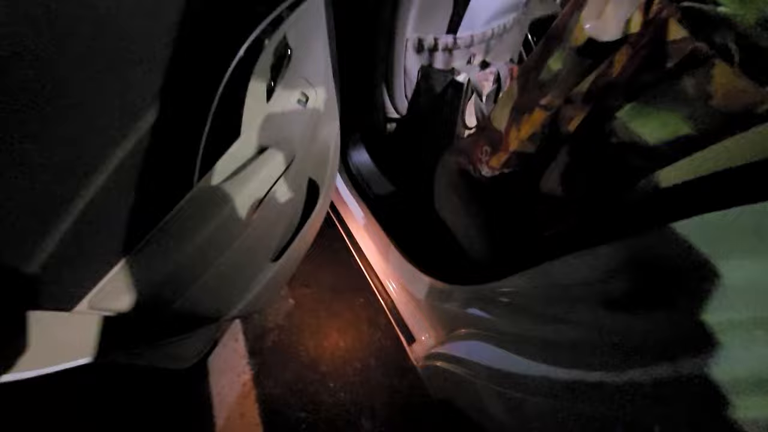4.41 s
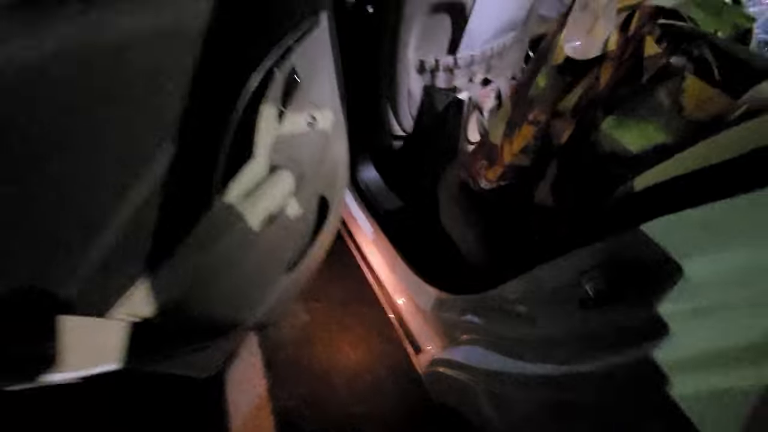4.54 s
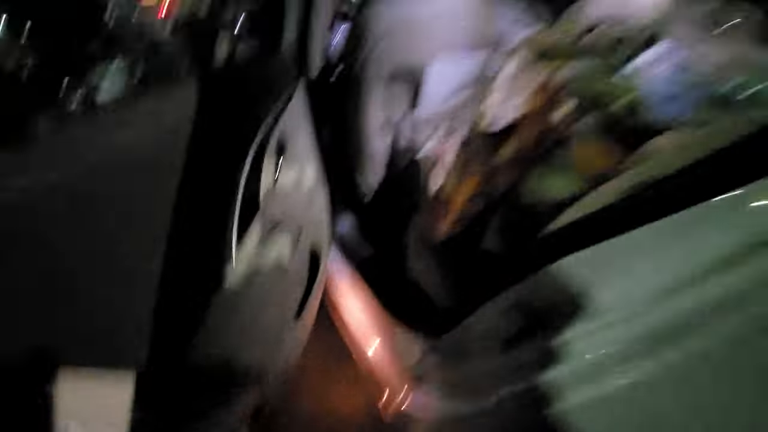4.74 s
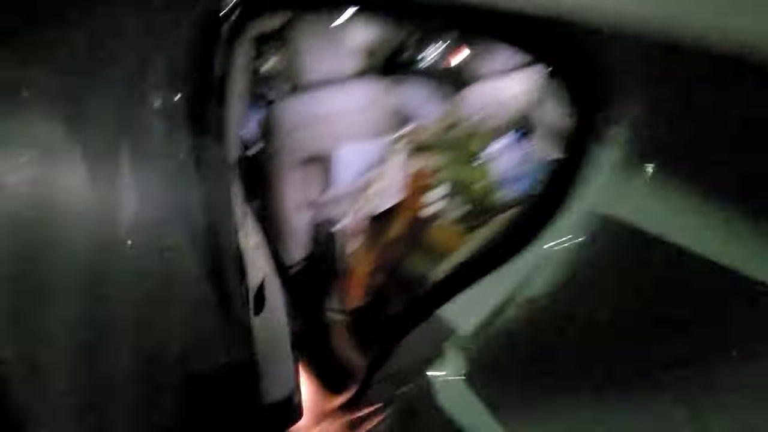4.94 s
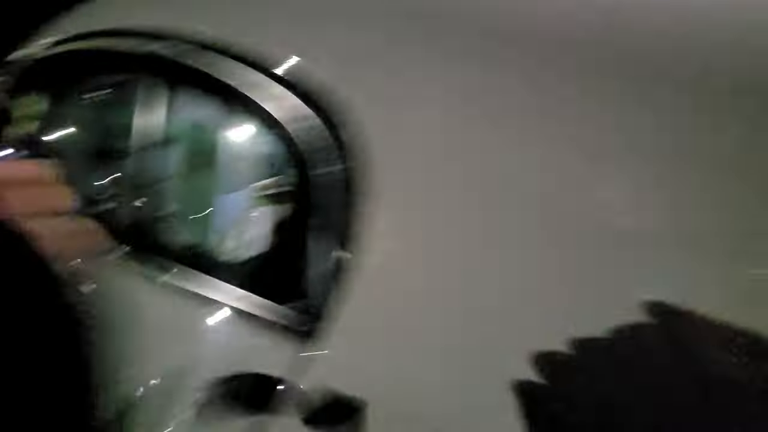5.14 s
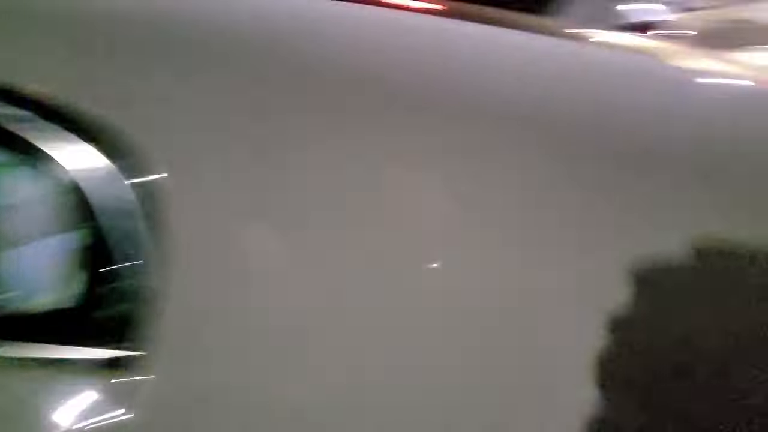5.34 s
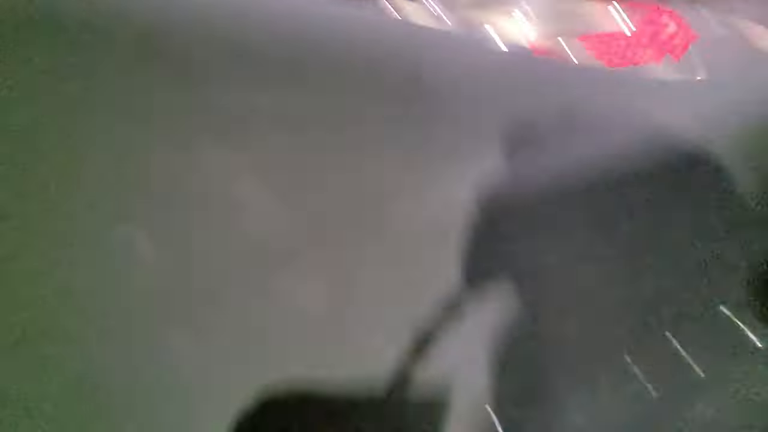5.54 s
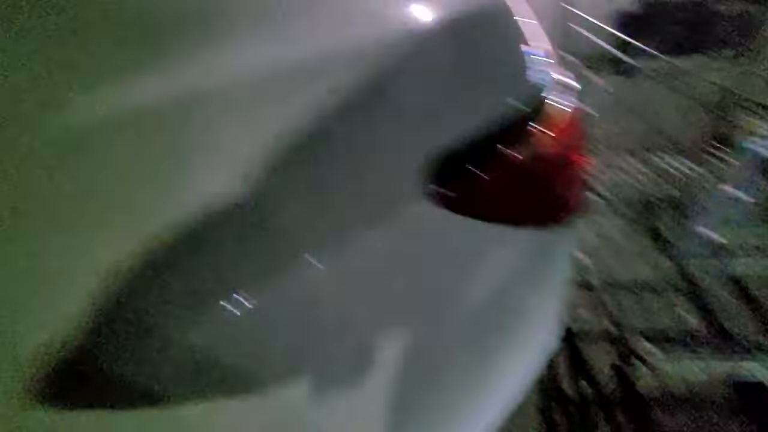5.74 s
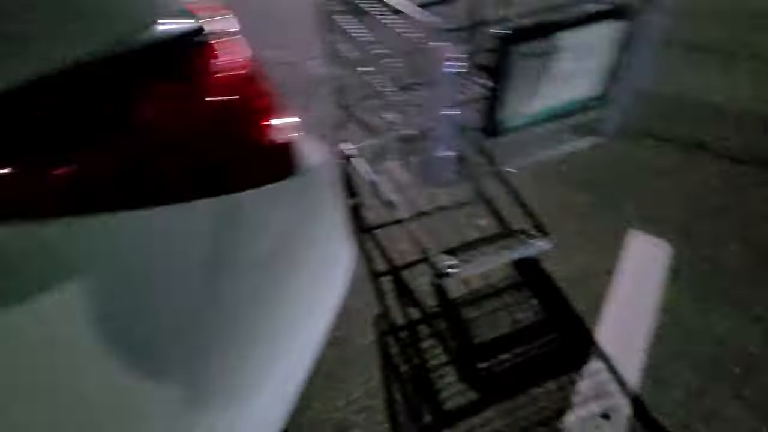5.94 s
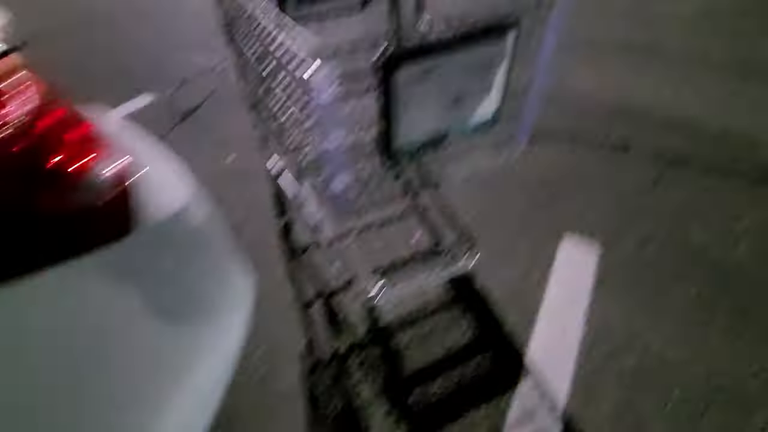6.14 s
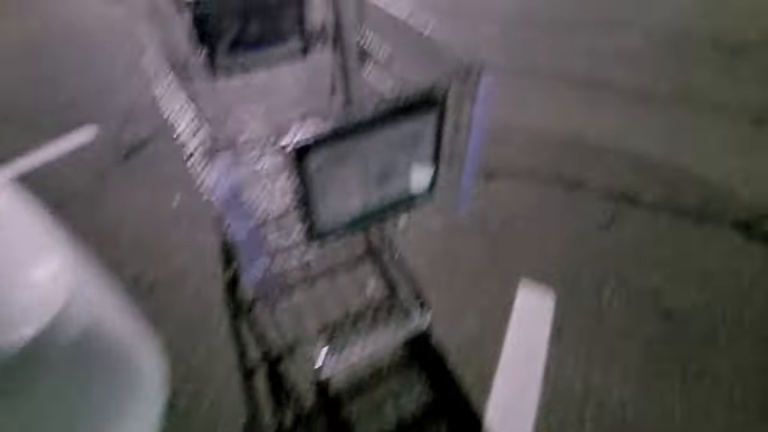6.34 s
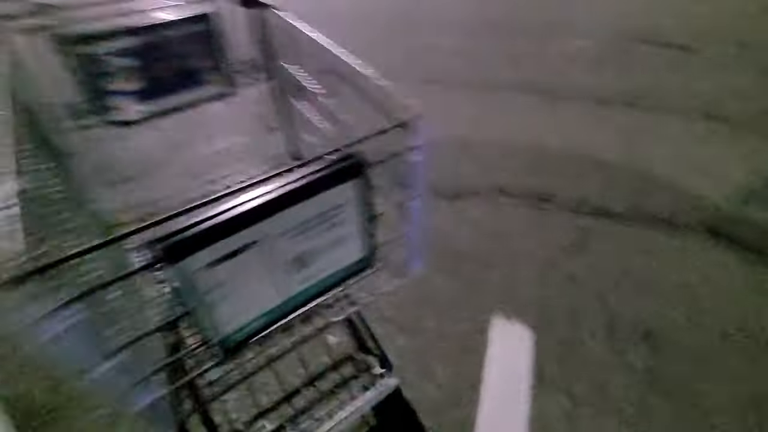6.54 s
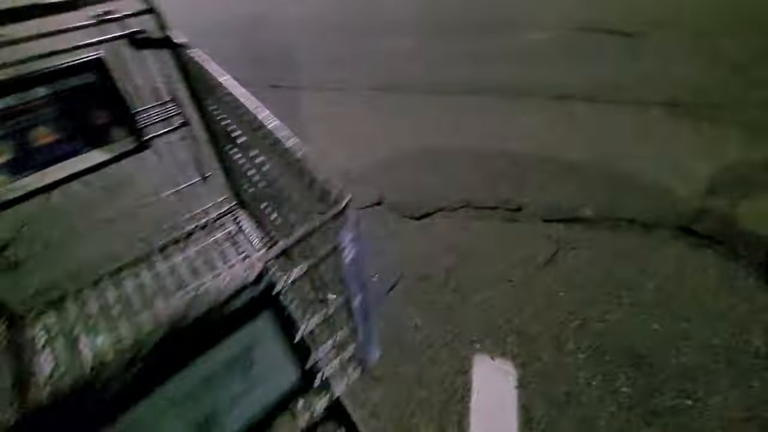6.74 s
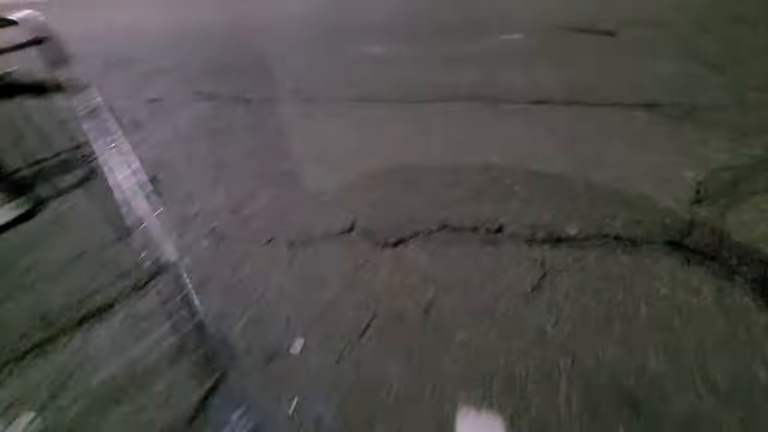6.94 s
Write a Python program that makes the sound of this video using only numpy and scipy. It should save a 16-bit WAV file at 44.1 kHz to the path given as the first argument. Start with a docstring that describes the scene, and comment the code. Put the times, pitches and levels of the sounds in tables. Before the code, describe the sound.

In a night parking lot, a loaded metal cart clatters and rustles, quiets, then a car door thuds shut before faint cloth swish and rolling.

```python
"""Shopping is shifted about in a wire cart close by, at night in a parking lot: knocks and scraping rustles
made of shaped noise and short rings. Under it idling cars drone, as slowly varying bands of noise.
Small metal parts jingle and latches snap, with bright rings and noise bursts. A car door slams with
dull noise and low vibrations. At last clothing swishes and the cart starts to roll, in grainy noise."""
import sys
import numpy as np
from scipy import signal
from scipy.fft import rfft, irfft
from scipy.io import wavfile

SR = 44100
rng = np.random.default_rng(int(sys.argv[2]) if len(sys.argv) > 2 else 0)


def output_pcm(signal):
    """Save a mono or channel-first signal as 16-bit PCM at the path in sys.argv[1].

    Samples are clipped to [-1, 1] before scaling.
    """
    pcm = np.clip(np.atleast_2d(signal).T, -1, 1) * 32767
    wavfile.write(sys.argv[1], SR, np.round(pcm).astype(np.int16))


N = 308700  # samples, 7 s
TIME, HZ = np.arange(N) / SR, np.fft.rfftfreq(N, 1 / SR)
RING = TIME[:SR // 3]  # time scale of one ring, in seconds
EDGE_HZ = 16000  # nothing is heard above this

# Levels in the tables are relative: each sound adds its own offsets and a slight lean to one side.
# Spectra give only a shape, since the noise is afterwards scaled to an even level.

# how alike left and right are: pitch_hz, likeness (0 to 1)
LIKENESS = [(30, .45), (60, 0.83), (130, 0.94), (300, 0.83), (700, 0.38), (1500, 0.083), (5000, 0.067),
            (15000, 0.13)]
PORT_LAG_S = 0.000279  # the left port leads by this much

# the parking lot: drone, rumble, road noise, hiss: low_hz, high_hz
LOT_BANDS = [(20, 100), (100, 420), (420, 4500), (4500, 16000)]
# colour of the night air: pitch_hz, level_db
AIR_SPECTRUM = [(12, -43), (20, -9), (76, -3.5), (178, -14.5), (286, -20.5), (600, -35.5), (1050, -40),
                (2300, -45), (3500, -56), (7000, -51), (9000, -55), (15000, -51.5)]
DRONE_HZ, DRONE_WIDTH_HZ = 56.8, 18
# drone of idling engines: time_s, level_db
DRONE_CURVE = [(0, -27.5), (1.6, -34), (3.5, -36), (3.95, -29.5), (4.45, -25.5), (4.75, -39.5),
               (5.05, -31.5), (5.4, -34), (5.8, -40), (5.96, -43), (6.4, -45.5), (6.68, -32.5), (7, -35.5)]
RUMBLE_DB, RUMBLE_FOLLOW = -17.5, 0.63  # the rumble above the drone swells with it, but less
# road noise: time_s, level_db
ROAD_CURVE = [(0, -37.5), (2.3, -66), (2.9, -50), (3.4, -56), (3.85, -48), (4.4, -43.5), (4.7, -53),
              (5.699, -56), (6.2, -53), (7, -45)]
# hiss: time_s, level_db
HISS_CURVE = [(0, -55), (4.5, -63.5), (4.7, -67), (5.9, -72.5), (6.7, -60)]

# registers of the cart's sound, hollow body, clack, crack, fizz: low_hz, high_hz
REGISTERS = [(125, 500), (500, 1800), (1800, 6000), (6000, 16000)]
# clack, crack and fizz of a contact of neutral brightness: level_db
REGISTER_DB = [-1, 1.1, -5.5]
# how far clack, crack and fizz follow the brightness: share
BRIGHT_SHARE = [-0.39, 0.7, 2.56]
# resonances of basket and frame: pitch_hz, width_hz, lift_db
FRAME_RESONANCES = [(276, 330, 1), (547, 75, 0.5), (906, 26, 1), (1010, 23, 2.5), (1300, 23, -4.5),
                    (1444, 15, -8), (2180, 180, 2), (2406, 78, 1), (2620, 32, 3), (3110, 40, 1.5),
                    (3380, 80, -1.5), (7440, 370, 5.5)]
# how busily the load is being handled: time_s, level_db
HANDLING_CURVE = [(0, -29), (.15, -42), (.5, -36.5), (.65, -39), (1, -43.5), (1.15, -33.5), (1.55, -43.5),
                  (1.66, -36), (2.2, -32), (2.6, -51), (2.86, -49)]

# scraping strokes, the last two being small cloth swishes:
# start_s, length_s, level_db, brightness_db, thud_db, change_db (over the stroke)
SCRAPES = [(0.008, 0.082, -40.5, -5, -25.5, 4.5), (0.566, 0.043, -31.5, 4, -27, -2),
           (1.029, 0.059, -33.5, -1, -35, 2.5), (1.285, 0.13, -30, 0.5, -30.5, -9),
           (1.726, 0.345, -23, 0.47, -22, -16.5), (2.061, 0.33, -23.5, 0.5, -17, -18.5),
           (2.336, 0.218, -36.5, -2.5, -28, -5.5), (2.709, 0.082, -46.5, 4, -31.5, -5.5),
           (3.519, 0.054, -50, 3.5, -48, -16), (3.764, 0.071, -64.5, 8, -41, -1.5),
           (4.975, 0.077, -60, 5, -37, -2)]
# colour of dragged bags and cloth: pitch_hz, level_db
RUSTLE_SPECTRUM = [(65, -40), (110, 8.5), (141, -1.5), (188, -8.5), (289, 3), (370, -14.5), (645, -12),
                   (1010, -11.5), (1320, -8.5), (2560, -15.5), (3480, -16), (7300, -27), (8610, -30.5),
                   (15000, -26.5)]
# how far each register follows the swell or fade of a stroke: share
FADE_SHARE = [0.84, 1.02, 1.38, 0.98]

# knocks of the load against the cart: start_s, level_db, brightness_db, thud_db, pitch_hz (struck part)
KNOCKS = [(0.029, -32, 0.5, -22, 1500), (0.055, -24.5, -12, -17.5, 550), (0.066, -22, -1.5, -34, 3280),
          (0.07, -23.5, -13, -23, 820), (0.09, -33.5, -12, -13.5, 530), (0.22, -38.5, -11, -40, 870),
          (0.332, -30, -6.5, -23.5, 1370), (0.361, -30.5, -4.5, -23.5, 2840), (0.408, -36.5, 1, -24.5, 530),
          (0.428, -34.5, -6.5, -65, 850), (0.487, -56, -19, -22.5, 556), (0.576, -29.5, -21, -39, 2620),
          (0.585, -21.5, 0.5, -23, 3480), (0.601, -28, 1.5, -27, 3430), (0.669, -38.5, -4, -26, 3220),
          (0.72, -34, -6, -25, 564), (0.737, -41, -18, -23, 530), (0.775, -35, -9, -34.5, 830),
          (0.837, -38, -10, -34.5, 1690), (0.887, -38.5, -8, -54, 900), (1.015, -36.5, -15, -23, 710),
          (1.047, -22, -11.5, -23, 850), (1.062, -21, -0.5, -16.5, 2040), (1.08, -28.5, 1.4, -46, 2830),
          (1.197, -27.5, -1, -16.5, 3360), (1.29, -27, 2, -24, 2440), (1.422, -32.5, -0.5, -23.5, 3550),
          (1.471, -35.5, -5.5, -35, 1530), (1.533, -38.5, -12, -37, 920), (1.603, -39.5, -1.5, -36.5, 3940),
          (1.718, -27, 1, -24, 1010), (1.731, -21, -9.5, -40, 1010), (1.741, -21.5, 2, -26, 2540),
          (1.762, -21, 0.5, -22, 2260), (1.776, -22, -2, -23, 2100), (1.793, -24, -7, -20, 1150),
          (1.822, -24, -5, -14.5, 2430), (1.839, -24.5, -4, -37, 2800), (1.868, -28, 0, -23, 2210),
          (2.055, -20.5, -1.5, -20, 2000), (2.065, -32, 0, -17, 2320), (2.116, -23, -2, -32, 2640),
          (2.134, -19.5, -0.5, -18.5, 2700), (2.15, -22.5, 0, -24.5, 1560), (2.177, -23.5, 1, -23.5, 2260),
          (2.25, -26.5, -1, -24.5, 4330), (2.366, -28.5, -4, -24, 3080), (2.392, -29.5, -1, -48, 3800),
          (2.404, -27, -3, -37, 2390), (2.464, -33.5, -2.5, -35, 3880), (2.523, -27, -5, -30, 1410),
          (2.532, -33.5, -1.5, -53, 1980), (2.594, -46.5, -13, -32.5, 1160), (2.692, -39.5, -13, -34, 1940),
          (2.797, -44.5, 4, -30, 590), (2.921, -45, -9, -33.5, 2120), (2.983, -37.5, -10, -37, 1440),
          (3.196, -45.5, -10.5, -43, 1740), (3.524, -38.5, -15, -31, 730), (3.739, -60, -12, -29, 520),
          (3.828, -47, -9, -30.5, 524), (4.137, -41, -12, -28.5, 1460), (5.375, -56.5, -11, -56, 1390),
          (6.023, -47.5, -9, -56, 1280), (6.103, -46.5, -15, -44, 910), (6.501, -49, -7, -46, 3300),
          (6.648, -51, -11, -34, 1630)]
# fast die-away of a knock in each register: t60_s
KNOCK_T60_S = [0.052, 0.035, .036, 0.02]
# colour of the loaded cart: pitch_hz, level_db
BODY_SPECTRUM = [(65, -38), (110, -17.5), (138, -0.5), (188, -5.5), (289, 3), (474, -9), (558, -6),
                 (672, -7.5), (1880, -13), (2360, -12.5), (4550, -19), (7450, -19.5), (9160, -23),
                 (15000, -18.5)]
# close modes of a struck part around its pitch: ratio
PART_RATIOS = [1, 1, 1.19]
PART_DB, PART_T60_S = 5.5, 0.03  # each of these modes
CHATTER_PER_S, CHATTER_DB, CHATTER_SPREAD_DB = 22, -7, 9  # loose wires tap while the load is handled

# small metal parts touching: start_s, level_db
JINGLES = [(0.025, -34), (0.463, -28), (1.604, -25.5), (2.8219, -22), (2.916, -22), (3.5877, -39.5),
           (3.6472, -36), (4.3156, -35), (4.5025, -37), (4.556, -18), (4.6728, -43), (4.8983, -37),
           (5.089, -14), (5.116, -17), (5.1914, -28), (5.231, -34.5), (5.2715, -31), (5.3255, -45),
           (5.385, -45), (5.785, -39), (5.913, -37.5), (6.011, -38.5), (6.0806, -34.5), (6.6657, -40)]
# their ring: pitch_hz, level_db, t60_s
METAL_MODES = [(6650, 0.5, 0.042), (8930, -2.5, 0.07), (13400, -7.5, 0.086), (13100, -22, 0.15),
               (13100, 8.5, 0.042), (15500, -8.5, .04)]
REBOUND_S, REBOUND_DB = .024, -12.5  # typical delay of the lighter second touch, and its level

# dull thumps of the car body and the load: start_s, level_db, pitch_hz, t60_s
THUMPS = [(1.014, -7.5, 284, 0.088), (1.289, -1.5, 160, 0.034), (4.32, -6, 67, 0.26),
          (4.33, -16, 115, 0.34), (4.58, -23, 323, 0.26), (5.133, -0.5, 56.4, 0.41), (5.798, -20, 58, 0.26)]
# the door meets its seal, then settles: start_s, level_db
SLAMS = [(5.114, -11), (5.124, -5.5), (5.136, -11), (5.161, -18), (5.19, -16)]
# colour of the door: pitch_hz, level_db
DOOR_SPECTRUM = [(59, -29), (100, -6), (246, -6), (304, -7), (436, -21), (668, -20), (701, -22.5),
                 (761, -21), (1130, -22.5), (2510, -43), (5000, -52), (6500, -74), (11000, -120)]
# ring of the door panel: pitch_hz, level_db, t60_s
PANEL_MODES = [(113.7, -19.5, 0.66), (155, -12.5, 0.3), (261, -19.5, 0.72), (314.2, -13, 0.23),
               (391, -24, 0.37)]
CLATTER_DB = -12  # the door's trim clatters with each blow

# zipping drag, whose pitch dips and then rises: time_s, level_db, pitch_hz
ZIP_CURVE = [(1.295, -24, 2250), (1.335, -27.5, 1700), (1.374, -30.5, 2000), (1.403, -25, 2300),
             (1.432, -32, 2450)]

# a thin wire that rings on after a jolt: start_s, level_db, pitch_hz, t60_s
WIRE_RINGS = [(2.922, -50, 2250, 0.34)]

# hard snaps of latches: start_s, level_db, t60_s, treble_db (lift)
SNAPS = [(3.1435, -24, 0.069, 12), (4.5546, -15, 0.12, 5), (4.616, -35, 0.1, 4), (5.0864, -16.5, 0.16, 6),
         (5.097, -18, 0.13, -28), (5.116, -24, 0.063, 12), (5.1872, -29.5, 0.098, 2)]
# colour of the latches: pitch_hz, level_db
LATCH_SPECTRUM = [(240, -35), (400, -2), (791, -11.5), (1590, -6.5), (2090, -8), (2700, -6), (2870, -6.5),
                  (6610, -7.5), (8180, -10.5), (8820, -20), (12100, -14.5), (13300, -17), (15000, -14.5)]
CRACK_DB, CRACK_T60_S = -6.5, 0.03  # the brief crack at a latch's contact

# colour of the grit: pitch_hz, level_db
GRIT_SPECTRUM = [(400, -6), (700, -4.5), (1000, 1), (1500, -7), (2300, -5), (3300, -17.5), (4500, -23),
                 (8000, -44)]
SWISH_START_S, SHAKE_START_S = 6.15, 6.53  # a soft swish and faint grit begin to swell; the basket shakes
FLUTTER_HZ, FLUTTER_DB = 21.9, 3  # the swish and grit flutter, up to this rate


def amp(db):
    """Decibels to gain."""
    return np.exp(np.asarray(db) * (np.log(10) / 20))


def read(points, hz):
    """A table read along a logarithmic frequency axis."""
    f, value = np.transpose(points)
    return np.interp(np.log(hz + 1), np.log(f + 1), value)


def evened(x):
    """A sound scaled so that the average of its channels has rms 1."""
    return x / np.sqrt(np.mean(x.mean(0) ** 2) + 1e-20)


def add(mix, s, sound):
    """Mixes a sound in at a time in seconds."""
    part = mix[:, max(round(s * SR), 0):][:, :sound.shape[-1]]
    part += sound[..., :part.shape[1]]


def band(lo, hi):
    """Steep band-pass gain."""
    slopes = (1 + (lo / (HZ + 1)) ** 10) * (1 + (HZ / hi) ** 10)
    return (HZ < EDGE_HZ) / np.sqrt(slopes)


def peak(hz, width_hz):
    """Gain of one resonance, 1 at its centre."""
    return 1 / (1 + (2 * (HZ - hz) / width_hz) ** 2)


def ports(drive):
    """Spectra at two microphone ports, alike in the bass and apart in the treble."""
    a, b = rfft(drive)
    same = np.clip(read(LIKENESS, HZ), 0, 1)
    right = same * a + np.sqrt(1 - same ** 2) * b
    return np.array([a, right * np.exp(-2j * np.pi * HZ * PORT_LAG_S)])


def shaped(z, gain):
    """Port spectra through a colour, turned into sound at rms 1."""
    return evened(irfft(z * gain, N))


def noise():
    """Port spectra of white noise."""
    return ports(rng.standard_normal((2, N)))


def grains(per_s, spread_db, grain_s):
    """Port spectra of tiny slips of uneven size, each a short puff of noise."""
    size = amp(spread_db * np.minimum(rng.exponential(1, N), 4))
    size = size * (rng.random(N) < per_s / SR)
    power = signal.lfilter([1], [1, -np.exp(-1 / (SR * grain_s))], size ** 2)
    return ports(np.sqrt(power) * rng.standard_normal((2, N)))


def burst(source, t60, rise_s, tail_db, tail_t60):
    """A piece of noise dying fast, then slowly; its energy is that of rms 1 for about 13 ms."""
    start = rng.integers(N - len(RING))
    fall = amp(-60 * RING / t60) + amp(tail_db - 60 * RING / tail_t60)
    fade = fall * (1 - np.exp(-RING / rise_s))
    return evened(source[:, start:start + len(RING)] * fade) / 5


def mode(hz, t60, rise_s, phase=0):
    """One dying vibration: a sine that rises quickly and fades by 60 dB in t60 seconds."""
    swing = np.sin(2 * np.pi * hz * RING + phase)
    return swing * amp(-60 * RING / t60) * (1 - np.exp(-RING / rise_s))


def stroke(start, length, db, change_db, attack_s, release_s):
    """Gain of one push: attack, a steady swell or fade, release."""
    gain, t = np.zeros((1, N)), np.arange(0, length, 1 / SR)
    ends = np.clip(np.minimum(t / attack_s, (length - t) / release_s), 0, 1)
    add(gain, start, amp(db + change_db * t / length) * ends)
    return gain


def along(s, db, edge_s):
    """Gain along a level curve with quick ends."""
    ends = np.clip(np.minimum(TIME - s[0], s[-1] - TIME) / edge_s, 0, 1)
    return amp(np.interp(TIME, s, db)) * ends


def flutter(depth_db, top_hz):
    """A gain that wavers at random, no faster than about top_hz."""
    waver = irfft(rfft(rng.standard_normal((1, N))) * band(2.8, top_hz), N)
    return amp(depth_db * evened(waver))


def cart_colour(spectrum):
    """A broad spectrum with the resonances of the frame standing on it."""
    lift_db = sum(db * peak(hz, width) for hz, width, db in FRAME_RESONANCES)
    return amp(read(spectrum, HZ) + lift_db)


def contact(db, brightness, thud_db):
    """Register levels: weight drives the hollow body, a harder contact reaches further into the treble."""
    upper_db = db + brightness * np.array(BRIGHT_SHARE) + np.array(REGISTER_DB)
    return [thud_db, *upper_db]


def lot():
    """Engines drone in a narrow low band and the rumble follows; road noise and hiss lie above."""
    curves = (DRONE_CURVE, ROAD_CURVE, HISS_CURVE)
    drone_db, road_db, hiss_db = (np.interp(TIME, *np.transpose(curve)) for curve in curves)
    levels = [drone_db, RUMBLE_DB + RUMBLE_FOLLOW * drone_db, road_db, hiss_db]
    z = noise()
    colour = amp(read(AIR_SPECTRUM, HZ)) * (1 + amp(11.5) * peak(DRONE_HZ, DRONE_WIDTH_HZ))
    return sum(amp(db) * shaped(z, colour * band(*edges)) for db, edges in zip(levels, LOT_BANDS))


def scrapes():
    """Bags drag over the wires and cloth swishes by, in clumped slips; handling adds fine crinkles."""
    out, colour = np.zeros((2, N)), cart_colour(RUSTLE_SPECTRUM)
    z = grains(per_s=750, spread_db=0.5, grain_s=0.002)
    for k, edges in enumerate(REGISTERS):
        force = sum(stroke(s, length, contact(*touch)[k], FADE_SHARE[k] * change_db,
                           attack_s=0.0053, release_s=0.0043)
                    for s, length, *touch, change_db in SCRAPES)
        out += force * shaped(z, colour * band(*edges))
    crinkle_grains = grains(per_s=1100, spread_db=3.3, grain_s=.0015)
    crinkle = shaped(crinkle_grains, cart_colour(BODY_SPECTRUM) * band(220, 16000))
    busy = along(*np.transpose(HANDLING_CURVE), edge_s=0.0036)
    return out * flutter(depth_db=1.0, top_hz=70.8) + amp(-3.0) * crinkle * busy


def chatter(brightness, thud_db):
    """Light taps at random moments, on the whole stronger while the handling is busy."""
    s, db = np.transpose(HANDLING_CURVE)
    slots = np.arange(0, s[-1], 1 / CHATTER_PER_S)  # one tap falls in each slot
    late, strength = rng.random((200, 2))[:len(slots)].T
    times = slots + late / CHATTER_PER_S
    levels = np.interp(times, s, db) + CHATTER_DB + CHATTER_SPREAD_DB * (2 * strength - 1)
    return [(t, level, brightness, level + thud_db) for t, level in zip(times, levels)]


def knocks():
    """Blows rattle the loaded cart and briefly ring the part they land on; the bass swells more slowly."""
    out, colour = np.zeros((2, N)), cart_colour(BODY_SPECTRUM)
    z = grains(per_s=2500, spread_db=6, grain_s=0.0005)
    blows = [row[:4] for row in KNOCKS] + chatter(brightness=-5, thud_db=7.5)
    for k, (lo, hi) in enumerate(REGISTERS):
        rattle = shaped(z, colour * band(lo, hi))
        rise_s = max(0.5 / lo, .0012)
        for s, *blow in blows:
            hit = burst(rattle, KNOCK_T60_S[k], rise_s, tail_db=-25.5, tail_t60=0.13)
            add(out, s, amp(contact(*blow)[k]) * hit)
    for s, *blow, hz in KNOCKS:
        _, clack_db, crack_db, _ = contact(*blow)
        db = clack_db if hz < REGISTERS[2][0] else crack_db
        for ratio in PART_RATIOS:
            # the right port hears the part up to one port lag later
            phase = np.array([[0], [2 * np.pi * hz * ratio * PORT_LAG_S * rng.random()]])
            add(out, s, amp(db + PART_DB) * mode(hz * ratio, PART_T60_S, rise_s=.001, phase=-phase))
    return out


def jingles():
    """A tick and a few high modes, struck a little differently each time, then a light rebound."""
    out, tick = np.zeros((2, N)), shaped(noise(), band(5200, 16000))
    rebounds = [(s + REBOUND_S * (.5 + rng.random()), db + REBOUND_DB) for s, db in JINGLES]
    for s, db in JINGLES + rebounds:
        for hz, level_db, t60 in METAL_MODES:
            chance_db, detune = rng.uniform(-2, 2), rng.uniform(.996, 1.004)
            phase = 2 * np.pi * rng.random() + np.array([[0], [np.pi / 2]])
            ring = mode(hz * detune, t60, 0.00011, phase)
            add(out, s, amp(db + level_db + chance_db - 5.5) * ring)
        add(out, s, amp(db - 18.0) * burst(tick, t60=.018, rise_s=.0004, tail_db=-7, tail_t60=.1))
    return out


def car():
    """Low thumps, and a slam: the door's blows, the clatter of its trim and the ring of its panel."""
    out, z = np.zeros((2, N)), noise()
    door, trim = shaped(z, amp(read(DOOR_SPECTRUM, HZ))), shaped(z, band(600, 1600))
    for s, db in SLAMS:
        blow = burst(door, t60=0.15, rise_s=0.00081, tail_db=-10.0, tail_t60=0.28)
        clatter = burst(trim, t60=0.035, rise_s=0.001, tail_db=-20, tail_t60=0.16)
        add(out, s, amp(db) * blow)
        add(out, s, amp(db + CLATTER_DB) * clatter)
    # the panel starts to ring at the third blow
    add(out, SLAMS[2][0], sum(amp(db) * mode(hz, t60, 0.0016) for hz, db, t60 in PANEL_MODES))
    for s, db, hz, t60 in THUMPS:
        thump = mode(hz, t60, rise_s=0.2 / hz, phase=np.array([[.3], [-.3]]))
        add(out, s, amp(db) * thump)
    return out


def zipping():
    """A ribbed surface dragged past an edge: a fuzzy tone, noise shifted up to a gliding pitch."""
    s, db, hz = np.transpose(ZIP_CURVE)
    turn = np.exp(2j * np.pi * np.cumsum(np.interp(TIME, s, hz)) / SR)
    fuzz = irfft(rfft(rng.standard_normal((2, 2, N))) * peak(0, width_hz=1100), N)
    tone = evened(fuzz[0] * turn.real + fuzz[1] * turn.imag)
    return tone * along(s, db, edge_s=0.0046)


def wire():
    """A loose wire of the basket sings faintly, as one dying vibration."""
    out = np.zeros((2, N))
    for s, db, hz, t60 in WIRE_RINGS:
        add(out, s, amp(db) * mode(hz, t60, rise_s=.002))
    return out


def snaps():
    """Latches snap and ring off in the car's opening: noise bursts, each with a brief crack."""
    out, z, colour = np.zeros((2, N)), noise(), amp(read(LATCH_SPECTRUM, HZ))
    treble = band(9200, 17000)
    for s, db, t60, treble_db in SNAPS:
        latch = shaped(z, colour * amp(treble_db * treble))
        ring = burst(latch, t60, rise_s=0.00083, tail_db=-35, tail_t60=0.18)
        crack = burst(latch, CRACK_T60_S, rise_s=0.00045, tail_db=-41, tail_t60=0.1)
        add(out, s, amp(db - 1) * ring)
        add(out, s + .001, amp(db + CRACK_DB) * crack)
    return out


def swish_and_roll():
    """A soft swish of clothing swells around 2-3 kHz, grit grows louder, the rolling basket rumbles."""
    z = grains(per_s=1200, spread_db=-0.5, grain_s=0.0013)
    swish_push = stroke(SWISH_START_S, length=0.403, db=-51, change_db=3, attack_s=0.49, release_s=.025)
    grit_push = stroke(SWISH_START_S, length=0.91, db=-57, change_db=16.5, attack_s=0.014, release_s=.17)
    shake = stroke(SHAKE_START_S, length=0.62, db=-35.5, change_db=3, attack_s=0.23, release_s=.1)
    cloth_swish = shaped(z, band(2000, 2700)) * swish_push
    grit = shaped(z, amp(read(GRIT_SPECTRUM, HZ)) * band(510, 9000)) * grit_push
    rumble = shaped(z, cart_colour(BODY_SPECTRUM) * band(100, 252)) * shake
    return (cloth_swish + grit) * flutter(FLUTTER_DB, FLUTTER_HZ) + rumble


def scene():
    """Handling, jingles and latches lean slightly to the left; car, lot, swish and rolling to the right."""
    left = knocks() + scrapes() + zipping() + jingles() + snaps() + wire()
    right = car() + lot() + swish_and_roll()
    return left * amp([[.6], [-.6]]) + right * amp([[-.5], [.5]])


def record(dry):
    """Peaks beyond full scale are clipped; then the treble is cut off at the band edge."""
    lowpass = signal.firwin(511, EDGE_HZ, window=("kaiser", 9), fs=SR)
    return signal.oaconvolve(np.clip(dry, -1, 1), lowpass[None], "same")


dry = scene()
out = record(dry)
output_pcm(out)
```